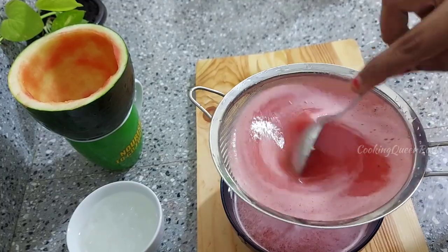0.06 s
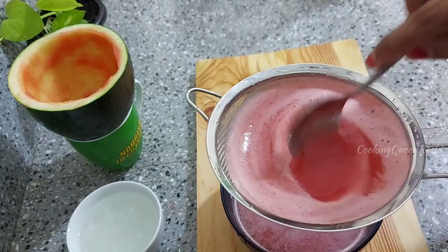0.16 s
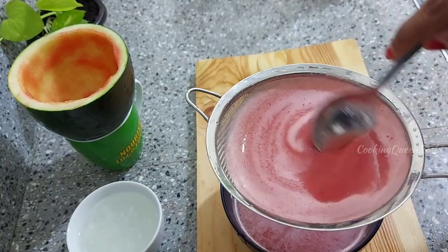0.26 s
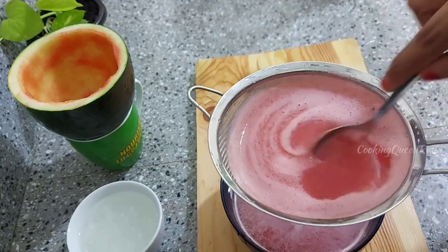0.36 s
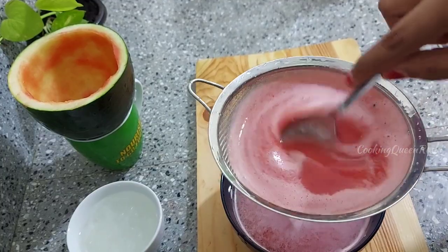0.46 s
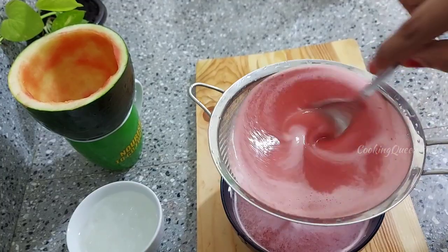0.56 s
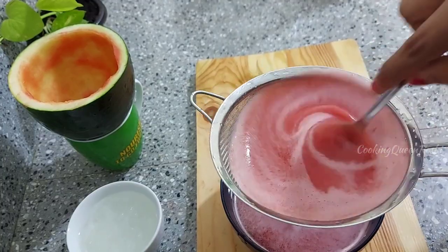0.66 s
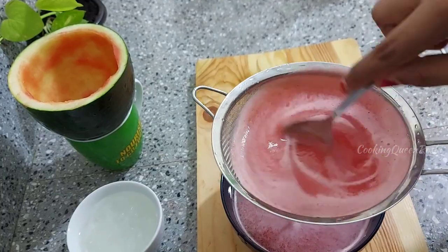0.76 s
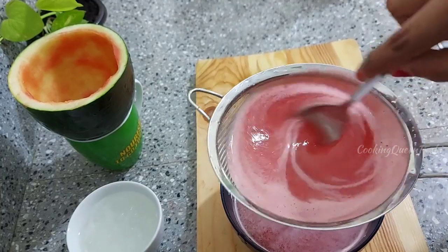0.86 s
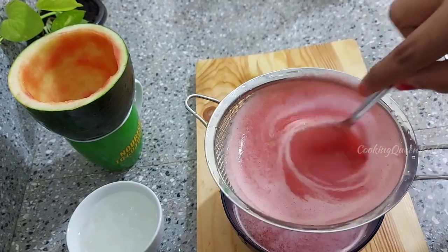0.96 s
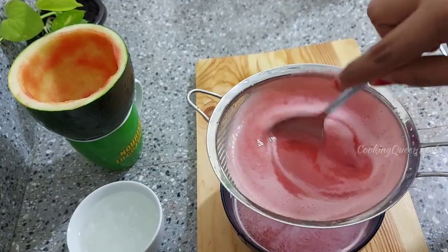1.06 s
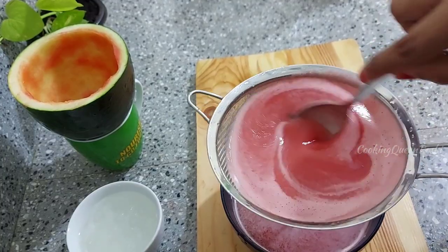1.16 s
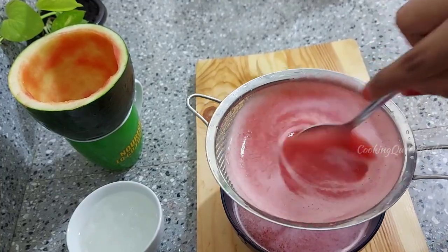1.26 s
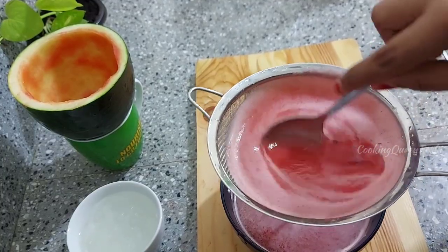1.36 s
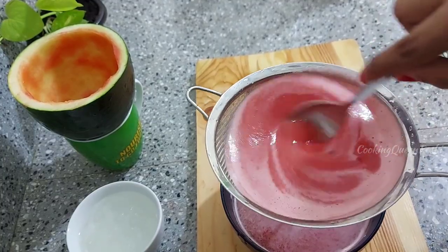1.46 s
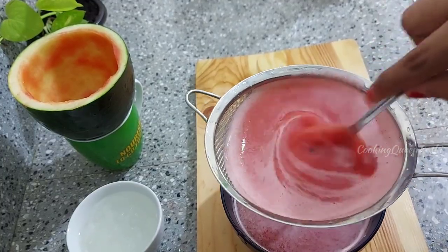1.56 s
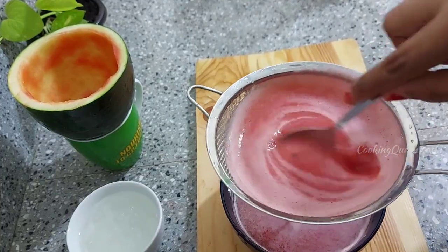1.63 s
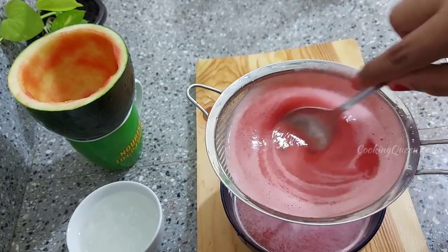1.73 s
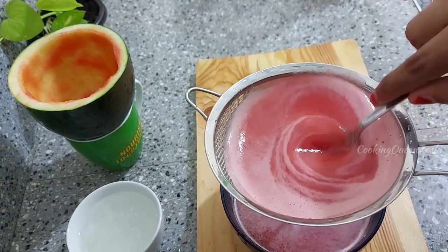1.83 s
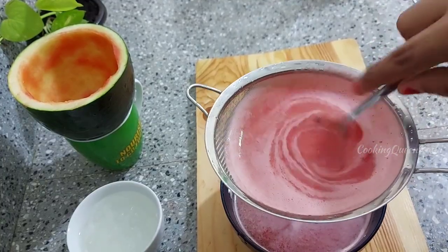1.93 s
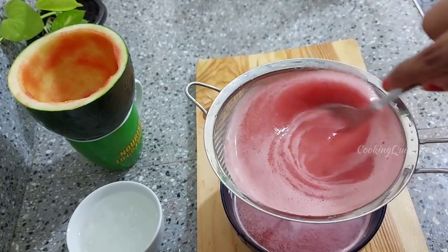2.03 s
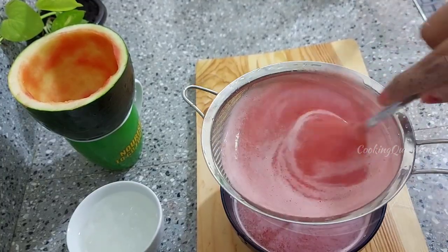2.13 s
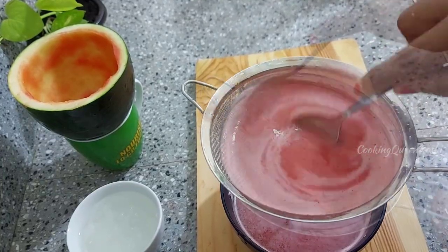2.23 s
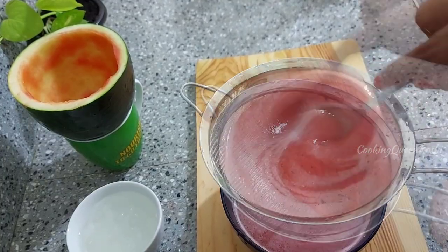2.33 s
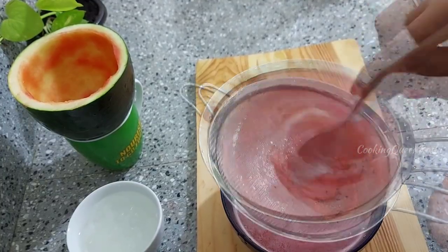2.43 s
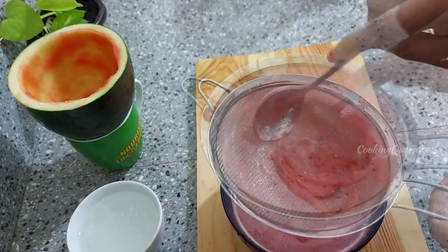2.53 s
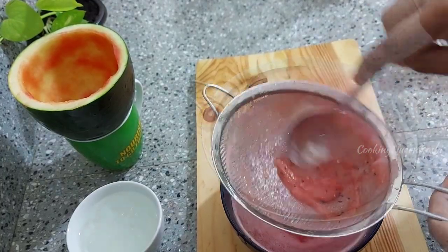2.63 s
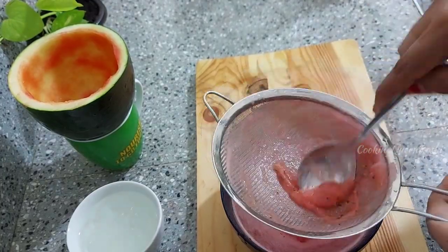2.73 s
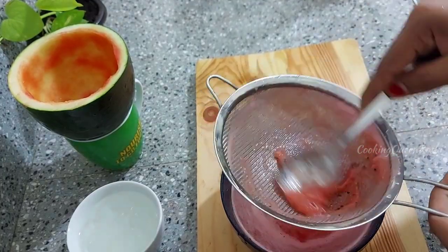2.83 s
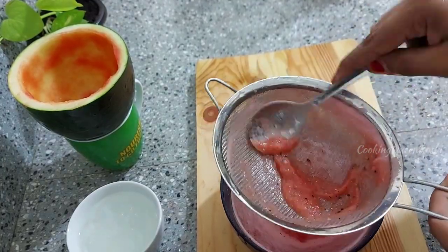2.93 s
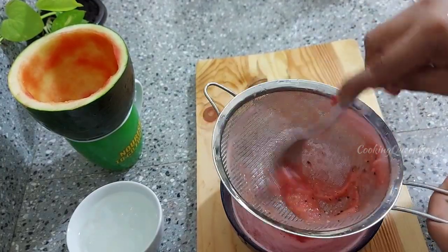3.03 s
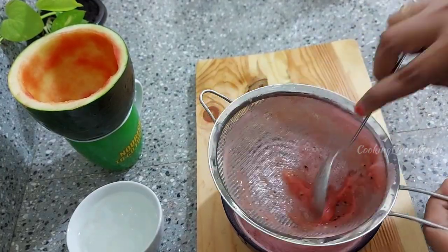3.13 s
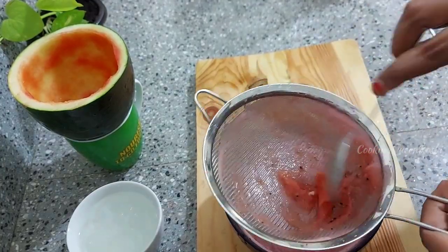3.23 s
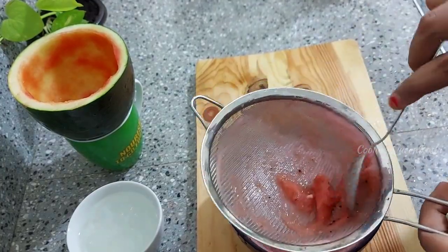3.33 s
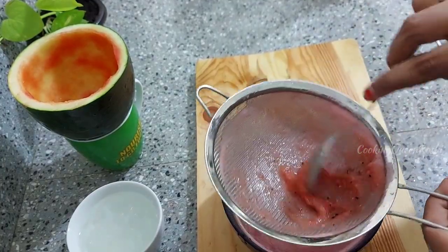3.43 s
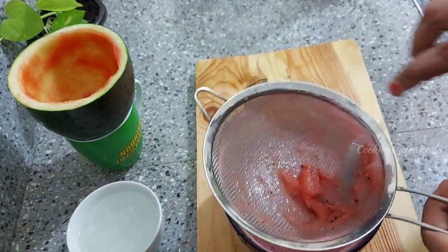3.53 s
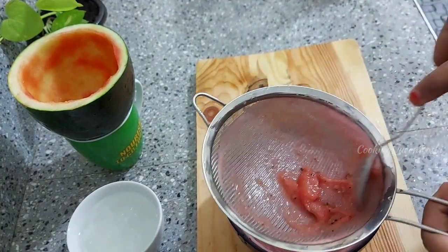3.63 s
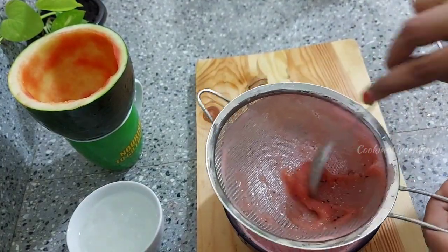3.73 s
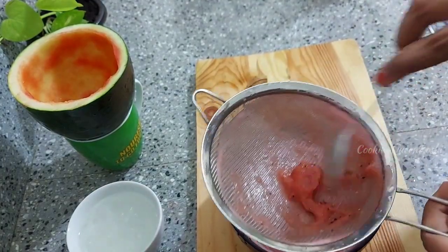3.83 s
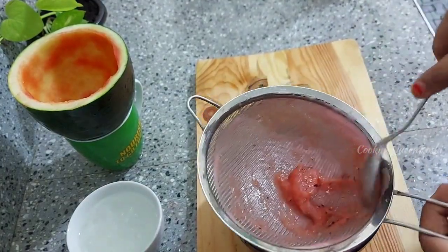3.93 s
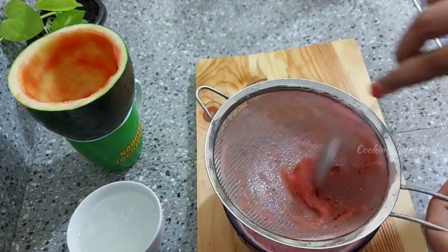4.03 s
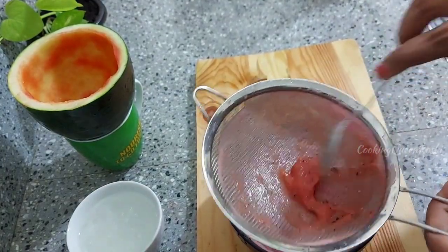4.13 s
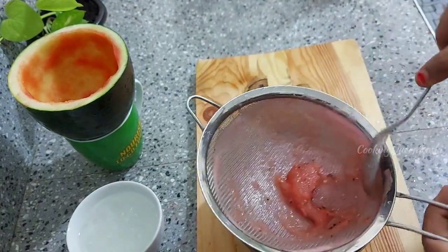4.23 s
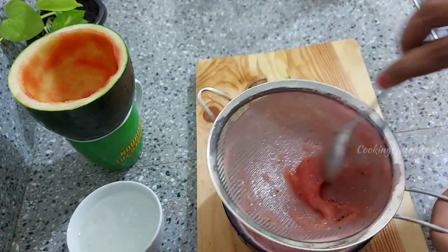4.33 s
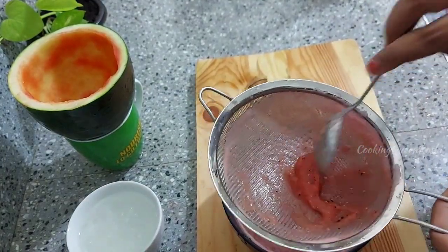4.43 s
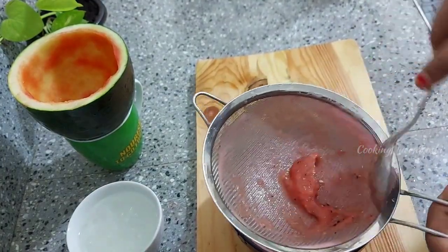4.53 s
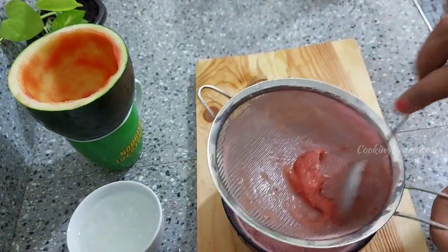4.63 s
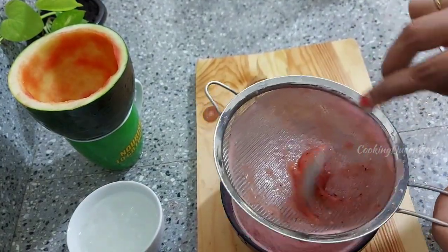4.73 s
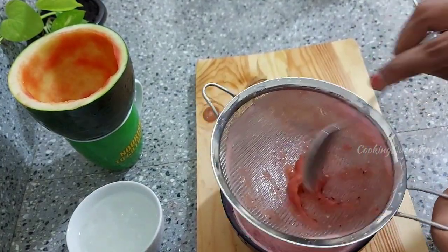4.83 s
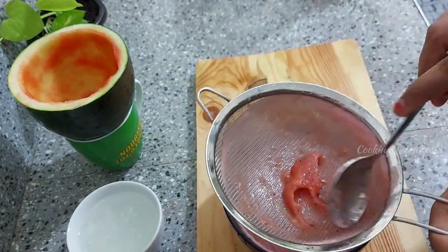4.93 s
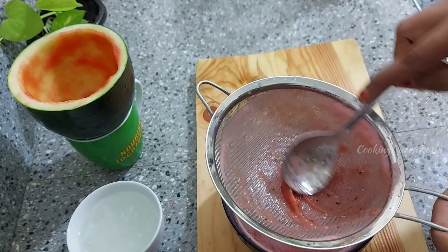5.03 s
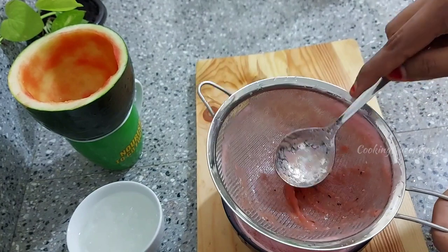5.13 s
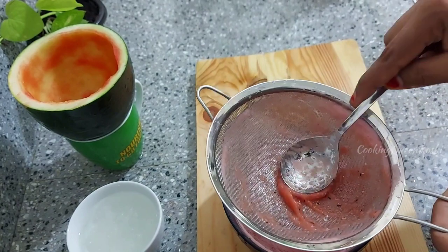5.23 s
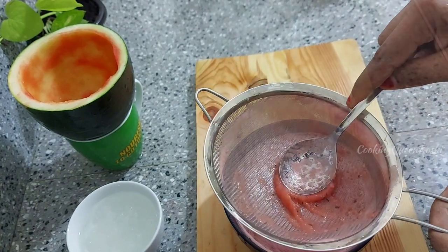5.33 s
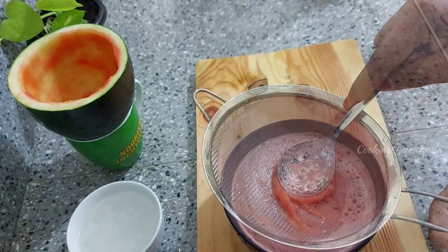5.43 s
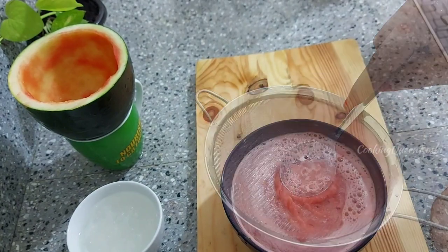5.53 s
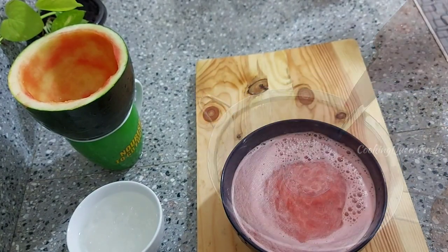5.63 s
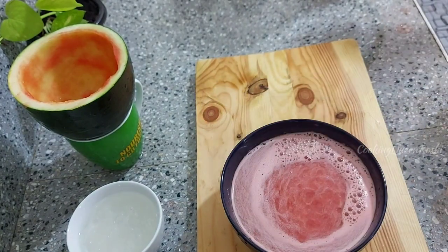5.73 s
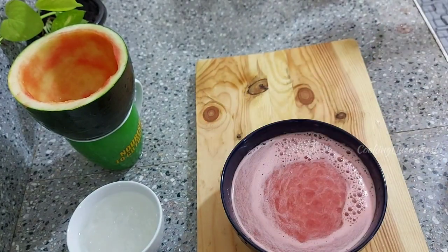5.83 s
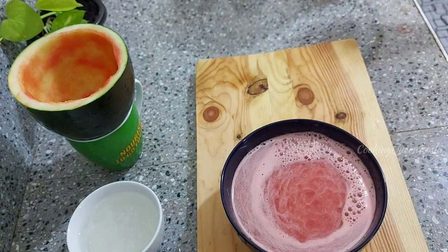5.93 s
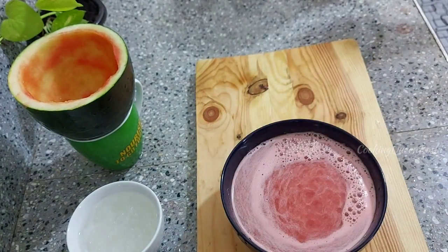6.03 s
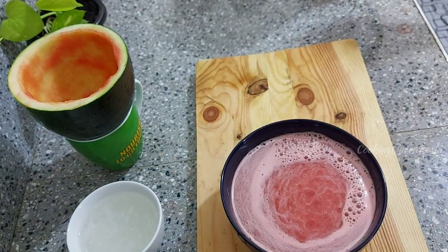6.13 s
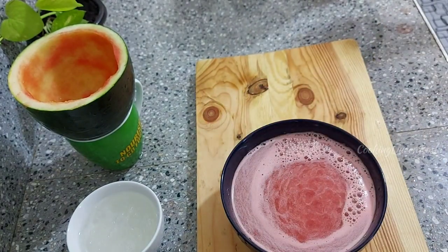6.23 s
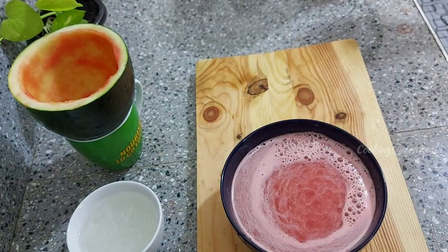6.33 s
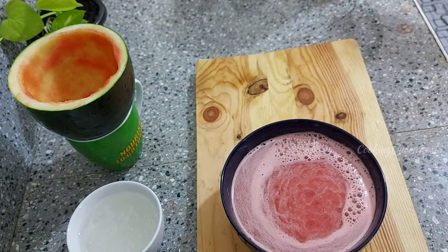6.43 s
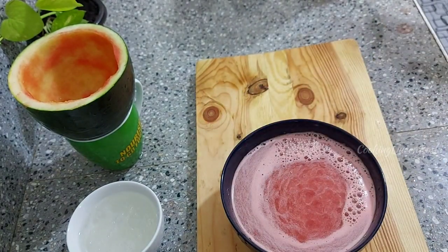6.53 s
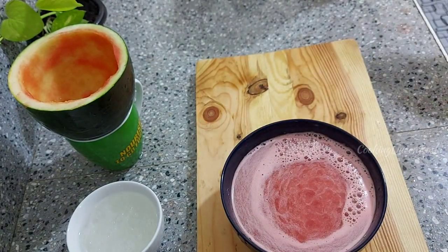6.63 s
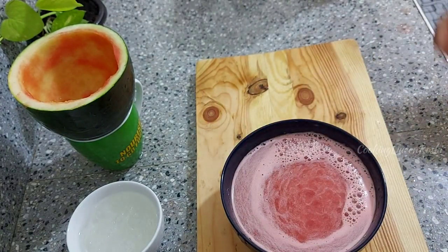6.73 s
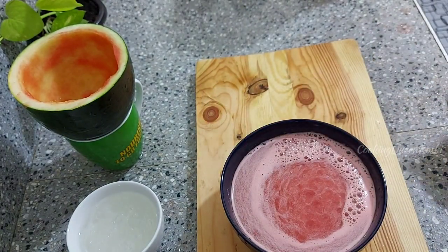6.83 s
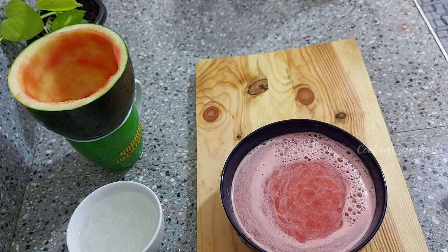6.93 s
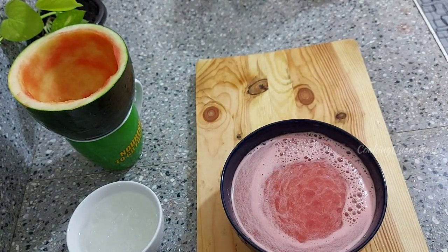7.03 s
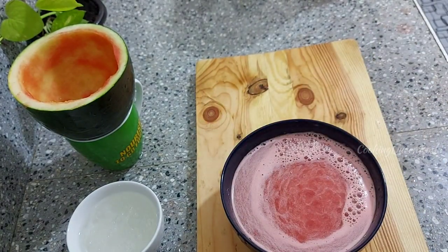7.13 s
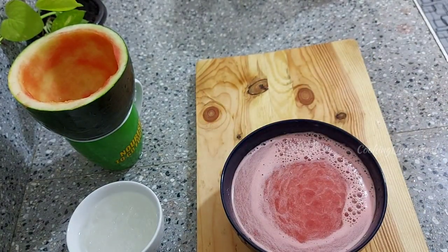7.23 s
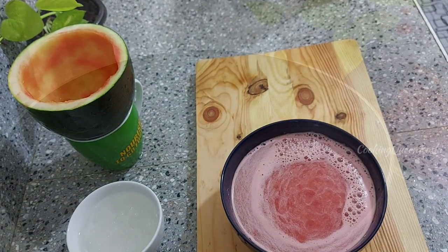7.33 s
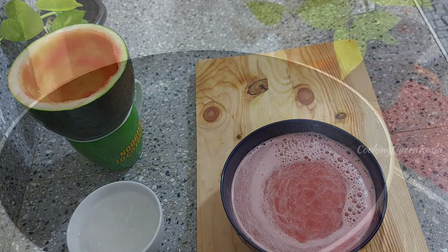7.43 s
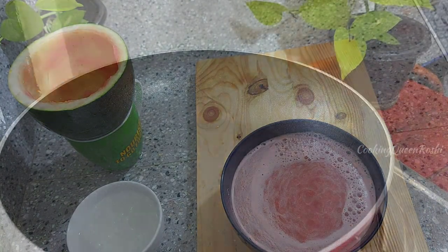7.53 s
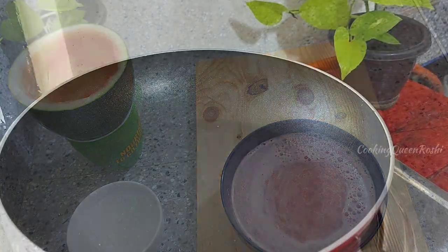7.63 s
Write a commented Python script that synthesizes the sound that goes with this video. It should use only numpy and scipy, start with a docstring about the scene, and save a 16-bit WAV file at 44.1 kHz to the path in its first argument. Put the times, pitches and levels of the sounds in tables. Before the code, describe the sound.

A metal spoon squelches through wet pulp in a steel strainer, then raps and scrapes the mesh, with a low motor hum behind.

```python
"""Spoon in a mesh strainer

A steel spoon stirs juicy pulp in a mesh strainer over a bowl, then knocks on the mesh and scrapes it.
Scrapes and knocks are bursts of clicks and noise that make steel ring; bubbles and two high squeaks are
short sine tones. Squelches are filtered clicks. Kitchenware ticks, and judders on the worktop as uneven
slips shake its low tones; a faint treble hiss comes near 5.45 s.
A motor hums beyond the small, hard-walled kitchen: wavering sines, a thin whine and a noise rumble.
"""
import sys
import numpy as np
from scipy import signal
from scipy.fft import rfft, irfft, next_fast_len
from scipy.io import wavfile
from scipy.ndimage import uniform_filter1d

SR = 44100
rng = np.random.default_rng(int(sys.argv[2]) if len(sys.argv) > 2 else 0)


def put_to_file(sound):
    """Save the sound as 16-bit audio at rate SR, in the file named by the first command-line argument."""
    columns = np.atleast_2d(sound).T  # one column per channel
    safe = np.clip(columns, -1, 1)
    whole_steps = np.round(safe * 32767)
    wavfile.write(sys.argv[1], SR, whole_steps.astype(np.int16))


N = 338291  # length in samples
TIME = np.arange(N) / SR  # s

# All levels in the tables are relative: each sound also has its own mixing gain.

# Strokes over the mesh, and a faint treble hiss near 5.45 s; brightness and low rasp are relative
# to the pressure: (start [s], rise [s], hold [s], release [dB/s], pressure [dB], brightness [dB],
#  low rasp [dB], basket boom [dB], pitch of the hollow under the spoon [Hz])
STROKES_AND_HISS = [(2.33, 0.056, 0.024, 320, -32, -7, -12, -43, 1484),
                    (2.624, 0.068, 0.017, 260, -35, -11.5, -1.5, -67, 2050),
                    (3.024, .014, .08, 280, -41, -3.5, 0.5, -60, 1590),
                    (3.349, 0.061, .012, 259.5, -50, -9, 1, -55, 1610),
                    (3.623, 0.089, 0.026, 340, -40, -5, 0, -53, 2110),
                    (3.965, .07, 0.023, 380, -43.5, -6, 1.5, -69, 1760),
                    (4.274, .055, .03, 340, -39.5, -8.5, -1, -39, 1108),
                    (4.599, 0.053, 0.036, 278.5, -47.5, -9.5, 2, -59, 1743),
                    (5.452, 0.022, 0.034, 41.5, -70.5, 2.5, 18, -72.5, 1620)]
# Sweeps of the spoon through wet pulp: (start [s], rise [s], hold [s], level [dB])
PULP_SWEEPS = [(0.36, 0.014, .008, -51), (0.517, 0.11, 0.065, -59.5), (0.736, 0.038, 0.031, -58),
               (0.899, .035, 0.026, -56), (1.07, 0.079, 0.1, -59.5), (1.21, 0.02, 0.064, -55.5),
               (1.365, 0.015, 0.088, -58.5), (1.501, 0.024, 0.03, -53.5), (1.656, 0.033, 0.095, -65),
               (1.866, 0.025, 0.086, -61.5), (2.067, 0.014, .06, -57), (2.253, .05, .03, -58)]
# Kitchenware nudged on the worktop:
# (start [s], rise [s], hold [s], release [dB/s], judder [dB], grit [dB])
WORKTOP_NUDGES = [(0.0, 0.0013, 0.024, 163, -46.5, -40.5), (1.196, 0.023, 0.027, 129, -39.5, -42),
                  (2.526, 0.019, 0.055, 268, -39.5, -41.5), (3.205, .01, 0.046, 120, -39.5, -55.5),
                  (4.908, 0.0065, 0.051, 129.5, -41.5, -55.5), (7.078, .005, 0.019, 95.5, -64.5, -50),
                  (7.573, 0.009, 0.004, 111, -48, -54.5)]
# Pushes that slide a hollow vessel along:
# (start [s], rise [s], hold [s], release [dB/s], judder [dB], grit [dB])
VESSEL_PUSHES = [(5.711, .008, 0.0233, 106, -44, -46.5), (5.755, 0.021, 0.026, 172, -34.5, -54),
                 (5.9, 0.18, 0.028, 230, -30.5, -43), (6.09, 0.0074, 0.026, 200.5, -45, -44),
                 (6.146, .006, 0.01, 380, -29, -53.5), (6.23, 0.067, 0.072, 260, -54, -96)]
# Knocks of the spoon and other kitchenware: (time [s], tick [dB], body [dB])
HARD_KNOCKS = [(0.1346, -38, -60), (0.319, -55, -75), (0.38, -43, -60), (0.512, -45, -54),
               (0.5955, -36, -68), (0.9997, -47, -59), (1.939, -47, -74.5), (1.9658, -49, -50),
               (2.297, -48, -54), (2.6368, -40.5, -48.5), (3.3277, -41.5, -40), (3.6178, -38, -42.5),
               (3.888, -55.5, -75.5), (3.9353, -18, -23.5), (4.205, -50, -71.5), (4.2389, -17.5, -28),
               (4.562, -18.5, -19.5), (4.9457, -37, -42.5), (5.328, -46.5, -66.5), (5.7183, -47, -43),
               (7.083, -44, -57.5), (7.165, -54.5, -61)]
# Larger bubbles and two short high squeaks (near 2.6 s): (time [s], level [dB], starting pitch [Hz])
WET_TONES = [(0.1019, -41.5, 1125), (0.1192, -43, 1376), (0.3698, -47, 1276), (0.379, -35, 1165),
             (0.4423, -35.5, 2670), (0.5121, -34, 3570), (0.556, -47.5, 3700), (0.567, -37.5, 1247),
             (0.5937, -37, 1150), (0.71, -44.5, 3300), (0.7213, -38, 2120), (1.3963, -43.5, 1225),
             (1.877, -47.5, 1000), (1.892, -52, 2300), (2.0936, -44.5, 2220), (2.146, -36.5, 1193),
             (2.2102, -32, 1147), (2.296, -44, 1210), (2.577, -37.5, 3400), (2.599, -36.5, 3120)]
# The spoon leans on the basket and keeps it booming:
# (start [s], rise [s], hold [s], release [dB/s], level [dB])
BASKET_LEANS = [(0.295, 0.041, 0.025, 104, -71), (0.82, 0.055, .03, 146, -56),
                (2.063, 0.031, 1.8, 36.5, -49), (3.018, 0.078, 0.0096, 396.5, -34)]
# Strength of the motor's hum and rumble: (time [s], level [dB])
HUM_LEVEL = [(0.0, -62.5), (2.33, -62.5), (2.6, -45.5), (2.82, -58.5), (3.05, -49.5), (4.14, -54),
             (4.66, -45), (4.89, -51), (5.45, -45), (5.64, -52.5), (6.09, -43.5), (6.37, -56.5), (6.6, -50),
             (6.75, -60.5), (7.5, -51), (7.67, -52)]
# Tones of the motor: (multiple of the shaft's turning rate [1], level [dB])
SHAFT_ORDERS = [(2, -20.5), (3, 10), (4, -7), (5, -4), (6, -20.5)]

# Tone colour of the wire mesh: (frequency [Hz], level [dB])
MESH_COLOUR = [(88, -43), (150, 3.5), (179, -2.5), (235, -12.5), (354, -5.5), (475, -12), (790, -11),
               (960, -17), (1240, -16), (1720, -22), (2100, -15), (5250, -18), (11300, -8.5),
               (16000, -14.5)]
# Tone colour of the wet pulp: (frequency [Hz], level [dB])
PULP_COLOUR = [(150, -34), (250, -24), (313, 22), (493, -13), (576, 0.5), (723, -11.5), (1010, -7.5),
               (1670, -18.5), (2200, -19), (6820, -24.5), (13400, -20), (16000, -38)]
# Tone colour of fine grit: (frequency [Hz], level [dB])
GRIT_COLOUR = [(300, -13), (700, -7), (1300, -6.5), (2300, -11), (4000, -10), (7000, -20), (12000, -18.5),
               (16000, -26)]
# Tone colour of a knock: (frequency [Hz], level [dB])
KNOCK_COLOUR = [(120, -30), (250, -6), (750, 0), (1200, -2), (2200, 2), (2800, -4), (3600, -2), (5200, -4),
                (6500, -8), (8500, -5), (11000, 0), (16000, -7)]
# Tone colour of the still room: (frequency [Hz], level [dB])
AIR_COLOUR = [(30, -26), (60, -10), (120, -8), (200, -14), (400, -19), (700, -25), (1500, -33), (3000, -41),
              (6000, -45), (10000, -43), (13000, -49), (16000, -58)]
# Tone colour of the motor's rumble: (frequency [Hz], level [dB])
RUMBLE_COLOUR = [(28, -52.5), (48, 7.5), (80, 5.5), (130, -7), (190, -2.5), (240, -18.5),
                 (400, -16.0), (900, -27.5), (3000, -41.0)]

# Ringing tones of the steel: (frequency [Hz], width [Hz], level [dB])
STEEL_MODES = [(350, 20, 0.5), (780, 15, 1.5), (996, 45, -2), (1265, 45, -10.5), (1350, 150, -1),
               (2046, 260, -15), (2420, 120, -6.5), (3300, 51, 0), (6570, 50, -4), (7050, 69, -17.5),
               (9500, 180, -8.5), (10450, 67, 2), (11300, 53, 11)]
# Ringing tones of the worktop: (frequency [Hz], width [Hz], level [dB])
WORKTOP_MODES = [(120.3, 10, 1.5), (176, 11, -12.5), (190, 11.6, 1.5), (278.5, 9, -3.5), (294.7, 16.4, 1),
                 (364.7, 12.4, 2.5), (419.4, 6.8, 1.5), (584, 80, -12.5)]
# Ringing tones of the basket: (frequency [Hz], width [Hz], level [dB])
BASKET_MODES = [(330, 36, 0), (410.4, 5.1, 10.5)]
# Ringing tones of the hollow vessel: (frequency [Hz], width [Hz], level [dB])
VESSEL_MODES = [(168, 86, -8.5), (267, 9.9, -7), (303.4, 18.6, 6), (354, 12.7, -6)]
# Upper ringing tones of the sliding kitchenware: (frequency [Hz], width [Hz], level [dB])
WARE_MODES = [(1222, 35, -3), (1349, 35, 3), (2263, 120, 2), (2617, 85, 4.5), (2995, 39, -3.5),
              (3720, 230, -14)]

# How long the kitchen's echoes take to fall by 60 dB: (frequency [Hz], time [s])
ROOM_DECAY = [(150, .45), (500, .5), (2000, .55), (6000, .45), (11000, .36), (15000, .26)]
# Lead of the left microphone over the right: (frequency [Hz], phase [rad])
MICROPHONE_LEAD = [(800, 0.63), (2500, -0.82), (5000, -1.92), (16000, -1.1)]

AIR_DB = -63
EDGE_HZ = 16000  # upper limit of the finished sound
SHAFT_HZ = 24.5  # average turning rate of the motor
# a short rasp follows each knock: level against the knock, fall and build-up time
SKID_DB, SKID_DB_PER_S, SKID_RISE_S = -18, 190, .014
STIR_DB_PER_S = 126  # the pulp settles after each sweep
TOUCH_DB, CONTACT_S = -14, .004  # a movement makes contact this far below its peak, within this time
STROKE_TOUCH_DB = -22  # a stroke starts this far below its peak
CHATTER_S = 0.0021  # decay of a knock's first chatter
TONE_CYCLES = 45  # cycles until a wet tone has fallen by 60 dB, so high ones die sooner
LEAN_FLICKER_DB = 3  # how unevenly the spoon leans
LOW_RASP_HZ = 1000  # below this the basket sounds as a whole


def amp(db):
    """Turns decibels into gain."""
    return 10 ** (np.asarray(db) / 20)


def unit(x):
    """Scales a sound to an rms level of 1."""
    return x / np.sqrt(np.mean(x ** 2) + 1e-20)


def read(points, hz):
    """Reads between the rows of a table on a log-frequency axis."""
    f, value = np.transpose(points)
    return np.interp(np.log(hz + 1), np.log(f + 1), value)


def add(mix, s, sound):
    """Mixes a sound in at time s."""
    part = mix[max(round(s * SR), 0):][:len(sound)]
    part += sound[:len(part)]


def drift(hz):
    """Slow random wandering of rms 1, up to about the given rate."""
    knots = rng.standard_normal(4000)
    return unit(np.interp(2 * hz * TIME, np.arange(len(knots)), knots))


def tint(x, spectrum, size=2048):
    """Colours a sound with a filter that never acts ahead of its input."""
    level = np.maximum(read(spectrum, abs(np.fft.fftfreq(size, 1 / SR))), -100)
    log_gain = np.log(amp(level))
    # the Hilbert transform finds the phase that puts the filter's energy as early as possible
    taps = np.fft.ifft(np.exp(np.conj(signal.hilbert(log_gain)))).real[:size // 2]
    return signal.oaconvolve(x, taps)[:len(x)]


def ring(x, modes):
    """Lets a sound excite a body's ringing tones, each a two-pole resonance."""
    return sum(amp(db) * signal.lfilter(*signal.iirpeak(hz, hz / width, SR), x) for hz, width, db in modes)


def resonate(x, hz, width):
    """Rings one resonance whose pitch follows the curve hz."""
    turn = np.exp(2j * np.pi * np.cumsum(hz) / SR)
    r = np.exp(-np.pi * width / SR)
    # shift the moving pitch down to zero, smooth there, then shift back
    return 2 * (turn * signal.lfilter([1 - r], [1, -r], x / turn)).real


def split(x, hz=5500):
    """Splits a sound into the parts below and above hz."""
    return [signal.sosfilt(signal.butter(4, hz, kind, fs=SR, output="sos"), x) for kind in ("low", "high")]


def grains(per_s, spread_db):
    """Random clicks, a few much larger than the rest."""
    size = amp(spread_db * np.minimum(rng.exponential(1, N), 4))
    return unit(size * rng.choice([-1, 1], N) * (rng.random(N) < per_s / SR))


def swell(start, rise, hold, release_db_per_s, db, touch_db=TOUCH_DB):
    """Gain of one movement: it makes contact, builds up, holds and dies away."""
    gain, t = np.zeros(N), np.arange(0, rise + hold + 1, 1 / SR)
    building = np.clip(1 - t / max(rise, 1e-3), 0, 1)
    dying = np.maximum(t - rise - hold, 0)
    contact = np.minimum(t / CONTACT_S, 1)
    add(gain, start, contact * amp(db + touch_db * building - release_db_per_s * dying))
    return gain


def kitchen(x, near_db, room_db, near_decay=0.0043, count=4):
    """Direct sound at two microphones, then bowl, worktop and room echoes that change as the source moves."""
    t, size = np.arange(SR // 2) / SR, next_fast_len(N + SR // 2, True)
    f = np.fft.rfftfreq(size, 1 / SR)

    # noise that dies away at each frequency's own rate makes the room echo
    hz, when, z = signal.stft(rng.standard_normal((count, 2, len(t))), SR, nperseg=256)
    fading = z * amp(-60 * when / read(ROOM_DECAY, hz)[:, None])
    tail = signal.istft(fading, SR, nperseg=256)[1][..., :len(t)]
    near = rng.standard_normal(tail.shape) * np.exp(-t / near_decay)
    echoes = ((near * (t > .0002), near_db), (tail * (t > .005), room_db))
    paths = sum(amp(db) * h / np.linalg.norm(h[0, 0]) for h, db in echoes)

    # the source wanders between several sets of echoes
    place = np.array([drift(4) for _ in range(count)])
    place /= np.linalg.norm(place, axis=0)
    echo = rfft(signal.oaconvolve((x * place)[:, None], paths, axes=2).sum(0), size)
    apart = f / (f + 120)  # long waves reach both microphones alike
    echo = echo * apart + echo.mean(0) * (1 - apart)
    direct = rfft(x, size) * np.exp(.5j * np.outer([1, -1], read(MICROPHONE_LEAD, f)))
    return irfft(direct + echo, size)[:, :N]


def motor(hum_db=-1, waver=0.015, flutter_db=1.0, rumble_db=-8, whine_hz=581):
    """Low multiples of the shaft's turning rate waver in a rumble that swells with them; a thin whine stays."""
    turns = np.cumsum(SHAFT_HZ * (1 + waver * drift(5.6))) / SR
    tones = np.zeros(N)
    for order, db in SHAFT_ORDERS:
        level = amp(db + flutter_db * drift(8))
        tones += level * np.sin(2 * np.pi * (order * turns + rng.random()))
    whine = amp(-73 + 2 * drift(2)) * np.sin(2 * np.pi * whine_hz * TIME)
    rumble = tint(rng.standard_normal(N), RUMBLE_COLOUR, size=8192)
    strength = amp(np.interp(TIME, *np.transpose(HUM_LEVEL)))
    return strength * (amp(hum_db) * unit(tones) + amp(rumble_db) * unit(rumble)) + whine


def air(apart_db=-2):
    """Still room noise: alike at both microphones in the bass, less alike in the hiss."""
    common, apart = (tint(rng.standard_normal(N), AIR_COLOUR, size=8192) for _ in range(2))
    side = amp(apart_db) * split(apart, hz=400)[1]
    return amp(AIR_DB) * (common + np.outer([1, -1], side)) / common.std()


def slipping(pushes, modes, judder_db, grit_db, top_hz, slips_per_s=500, ware_db=0):
    """Uneven slips shake a body's low tones and crunch fine grit, which rings its upper ones."""
    slips = grains(slips_per_s, 1.0)
    shaking = ring(slips, [(259, 790, 0)])
    judder = split(ring(shaking, modes), top_hz)[0]
    # friction holds the judder at the strength of the push
    judder /= (uniform_filter1d(judder ** 2, size=2200) + 1e-9) ** .5
    judder *= sum(swell(*shape, db) for *shape, db, _ in pushes)
    grit = tint(.5 * slips + grains(6000, 2.4), GRIT_COLOUR)
    crunch = unit(grit + amp(ware_db) * ring(grit, WARE_MODES))
    crunch *= sum(swell(*shape, db) for *shape, _, db in pushes)
    return amp(judder_db) * judder + amp(grit_db) * crunch


def shifts(thud_db=-13):
    """Kitchenware shifts and slides on the worktop, which thuds under each nudge."""
    nudges = slipping(WORKTOP_NUDGES, WORKTOP_MODES, judder_db=-1, grit_db=-9.0, top_hz=670)
    slide = slipping(VESSEL_PUSHES, VESSEL_MODES, judder_db=-2.5, grit_db=-0.5, top_hz=416)
    thud = unit(split(ring(rng.standard_normal(N), [(95.5, 60, 0)]), hz=208)[0])
    thud *= sum(swell(*shape, db) for *shape, db, _ in WORKTOP_NUDGES)
    return nudges + slide + amp(thud_db) * thud


def wet_tone(hz, t60, rise=0.016, onset=0.00017):
    """A dying tone that climbs a little in pitch, as a pocket of air does when it opens."""
    t = np.arange(SR // 10) / SR
    tone = np.sin(2 * np.pi * hz * t * (1 + rise * t / t60))
    return tone * (1 - np.exp(-t / onset)) * np.exp(-np.log(1000) * t / t60)


def pops_and_squeaks(twin_db=-7, smack_db=-8, spatter_db=-14, spatter_decay=0.001):
    """Larger bubbles and two squeaks: each rings with a higher twin, in a wet smack and a tick of spatter."""
    out, t = np.zeros(N), np.arange(SR // 10) / SR
    for s, db, hz in WET_TONES:
        t60 = TONE_CYCLES / hz
        smack = unit(ring(rng.standard_normal(len(t)), [(1.4 * hz, .6 * hz, 0)])) * np.exp(-t / .006)
        twin = amp(twin_db) * wet_tone(1.8 * hz, t60)
        ringing = .7 * wet_tone(hz, t60) + twin + amp(smack_db) * smack
        tick = rng.standard_normal(len(t)) * np.exp(-t / spatter_decay)
        add(out, s, amp(db) * (ringing + amp(spatter_db) * tick))
    return out


def knocks(steel_db=-1, rattle_db=-20, rattle_decay=0.018, body_db=-1, tick_db=-2, crack_db=15):
    """Each knock cracks, chatters for a few milliseconds and leaves a short rattle."""
    out, t = np.zeros(N), np.arange(SR // 6) / SR
    for s, tick, thud in HARD_KNOCKS:
        fading = np.exp(-t / CHATTER_S) + amp(rattle_db) * np.exp(-t / rattle_decay)
        chatter = rng.standard_normal(len(t)) * fading
        crack = amp(crack_db) * (t == 0)
        force = tint(chatter + crack, KNOCK_COLOUR)
        body, treble = split(force + amp(steel_db) * ring(force, STEEL_MODES))
        for part, db in ((body, thud + body_db), (treble, tick + tick_db)):
            loudest = np.sqrt(uniform_filter1d(part ** 2, size=88).max())  # rms over 2 ms
            add(out, s, amp(db) * part / loudest)
    return out


def scrape(wires_per_s=480, jitter=.22, spread_db=5, rub_db=-3, steel_db=-2, hollow_db=3, hollow_width=420,
           body_db=-5.0, treble_db=-1, skid_bright_db=-5):
    """An edge trips over crossed wires, faster under pressure, and steel and a hollow ring.

    The same rasp, shaped by other gains, follows each knock and makes the faint treble hiss.
    """
    pressure, sparkle, weight, hollows = np.zeros(N), np.zeros(N), np.zeros(N), []
    for start, rise, hold, release, db, bright_db, low_db, _, hz in STROKES_AND_HISS:
        stroke = swell(start, rise, hold, release, db, STROKE_TOUCH_DB)
        pressure += stroke
        sparkle += amp(bright_db) * stroke
        weight += amp(low_db) * stroke
        hollows.append((start + rise, hz))
    for s, tick_db, thud_db in HARD_KNOCKS:
        skid = swell(s, SKID_RISE_S, 0, SKID_DB_PER_S, SKID_DB)
        pressure += amp(thud_db) * skid
        weight += amp(thud_db) * skid
        sparkle += amp(tick_db + skid_bright_db) * skid

    speed = (pressure / pressure.max() + .01) ** .25
    trips = np.zeros(N)
    for slant in (1, 1.6):  # the two directions of wire are met at different rates
        wire = np.cumsum(wires_per_s * slant * speed * np.exp(jitter * drift(90))) / SR
        strength = amp(spread_db * np.clip(rng.standard_normal(N), -2, 2))
        trips += np.diff(np.floor(wire), prepend=0) * strength  # one click per whole wire passed
    catching = amp(1.4 * drift(70))
    rub = amp(rub_db) * grains(9800, 3.5)
    force = tint(catching * (unit(trips) + rub), MESH_COLOUR)

    hollow = resonate(force, np.interp(TIME, *np.transpose(hollows)), hollow_width)
    steel = ring(force, STEEL_MODES)
    body, treble = split(force + amp(steel_db) * steel + amp(hollow_db) * hollow)
    low, middle = split(unit(body), hz=LOW_RASP_HZ)
    return amp(body_db) * (weight * low + pressure * middle) + amp(treble_db) * sparkle * unit(treble)


def stirring():
    """Gain of the spoon's sweeps through the pulp."""
    return sum(swell(start, rise, hold, STIR_DB_PER_S, db) for start, rise, hold, db in PULP_SWEEPS)


def basket(boom_db=-9, stir_db=-2):
    """The basket booms softly and unevenly as the spoon leans, stirs or scrapes, and faintly with the hiss."""
    lean = sum(swell(*row) for row in BASKET_LEANS) * amp(LEAN_FLICKER_DB * drift(15))
    strokes = sum(swell(*shape, db) for *shape, _, _, _, db, _ in STROKES_AND_HISS)
    push = lean + amp(stir_db) * stirring() + strokes
    boom = unit(split(ring(grains(900, 0.77), BASKET_MODES), hz=447)[0])
    return amp(boom_db) * push * boom


def stir(squelch_db=-5, slosh_db=-11, cycles=24, count=14):
    """Pulp squelches through the mesh, sloshing in the strainer's hollow, while small bubbles burst."""
    crackle = grains(5000, 4.5)
    clumps = amp(3 * drift(30) - 1)
    squelch = unit(split(tint(crackle, PULP_COLOUR), hz=736)[1])
    slosh = unit(resonate(crackle, 1700 * np.exp(0.37 * drift(11)), 330))
    froth = np.zeros(N)
    for hz in np.geomspace(1000, 5000, count):  # bubbles of many sizes
        froth += signal.oaconvolve(grains(5, 2), wet_tone(hz, cycles / hz))[:N] / np.sqrt(hz)
    froth = .45 * unit(froth)
    return stirring() * (clumps * (amp(squelch_db) * squelch + amp(slosh_db) * slosh) + froth)


def scene():
    """Adds up the spoon, pulp, kitchenware, motor and room noise at two microphones."""
    scraped = kitchen(scrape(), near_db=0, room_db=-5)
    knocked = kitchen(knocks(), near_db=-1, room_db=-4, near_decay=.0018)
    wet = kitchen(stir(), near_db=-2, room_db=-3) + kitchen(pops_and_squeaks(), near_db=-8, room_db=-3)
    dull = kitchen(shifts() + basket(), near_db=-6, room_db=-8)
    balance = amp([[-.4], [.4]])  # scrapes and knocks are slightly louder on the right
    return (scraped + knocked) * balance + wet + dull + motor() + air()


def record(dry):
    """Removes what lies above the upper frequency limit."""
    taps = signal.firwin(401, EDGE_HZ, window=("kaiser", 8), fs=SR)
    return signal.oaconvolve(dry, taps[None], "same")


dry = scene()
out = record(dry)
put_to_file(out)
```